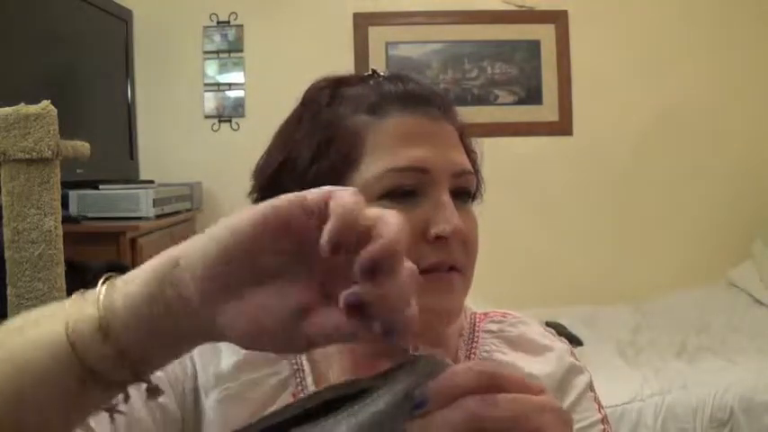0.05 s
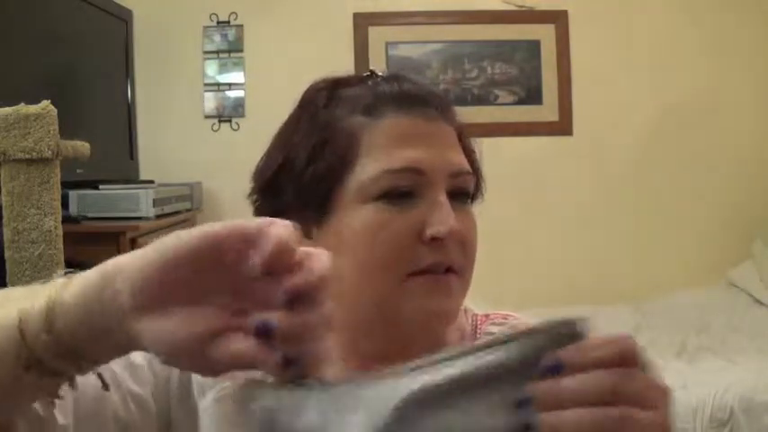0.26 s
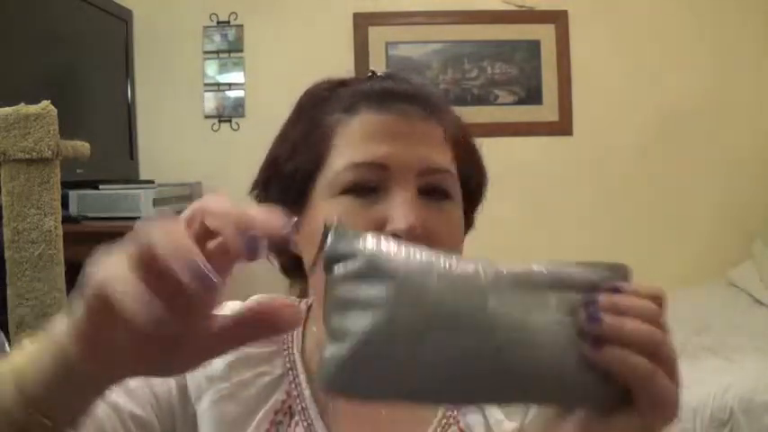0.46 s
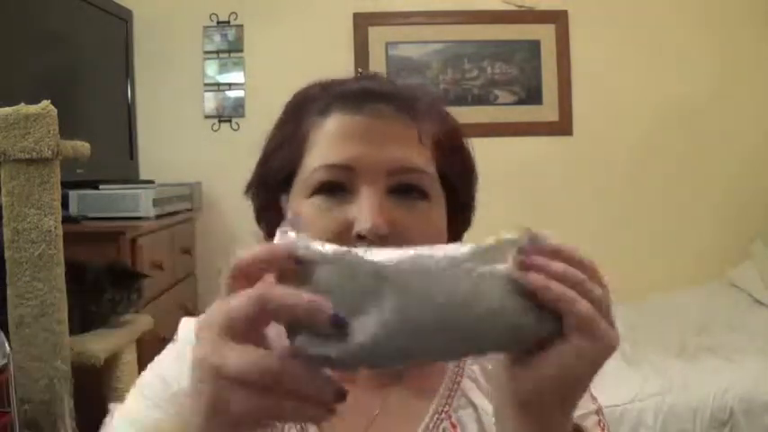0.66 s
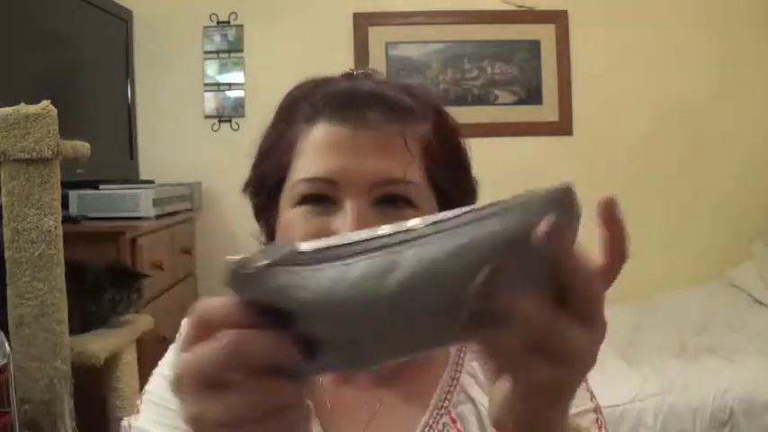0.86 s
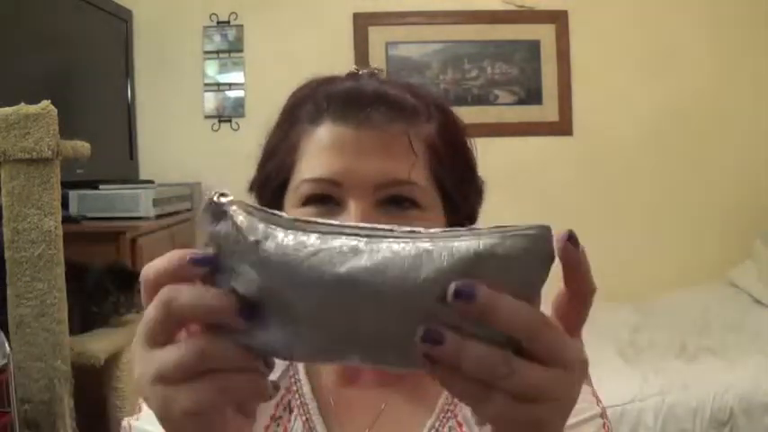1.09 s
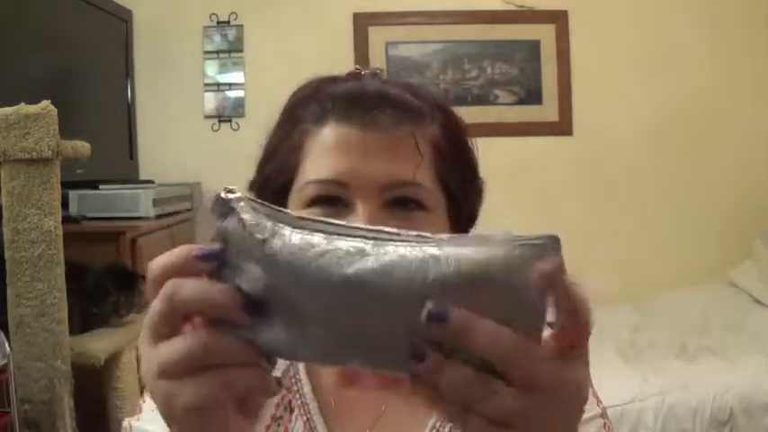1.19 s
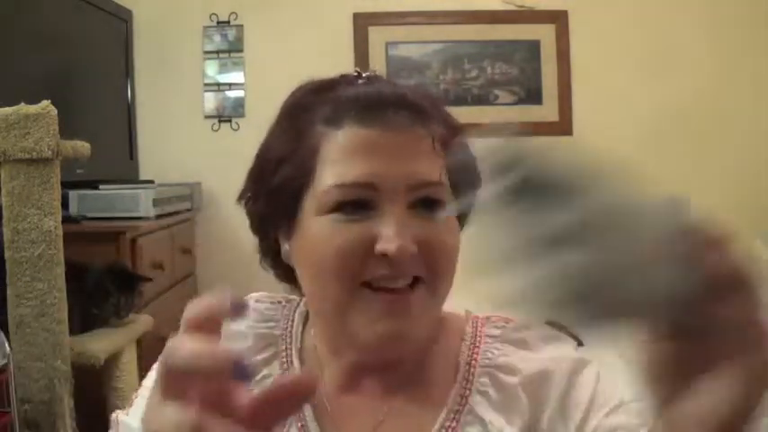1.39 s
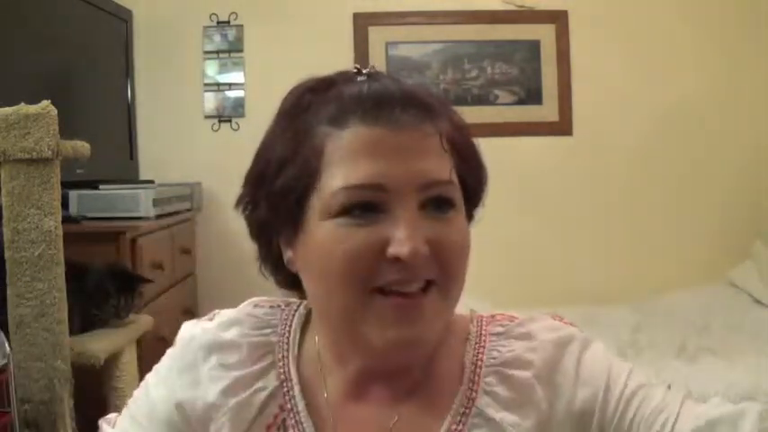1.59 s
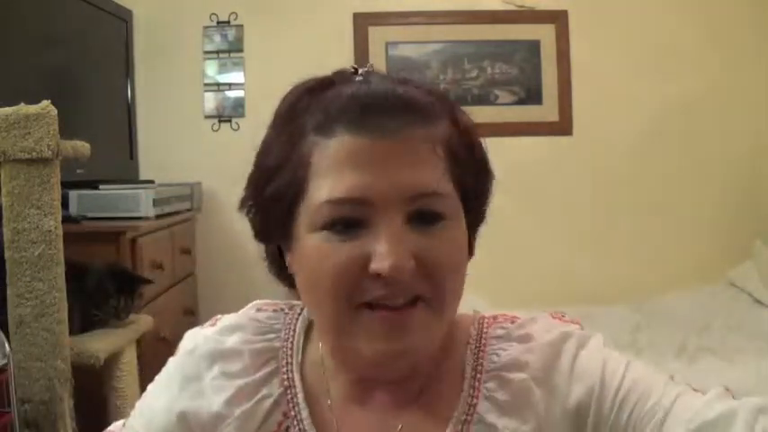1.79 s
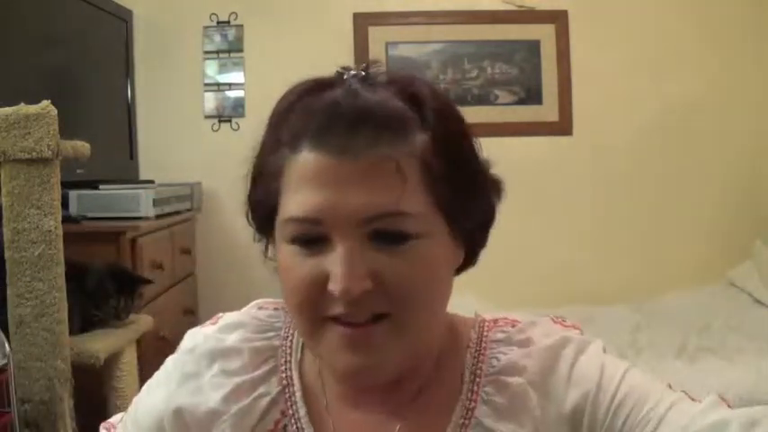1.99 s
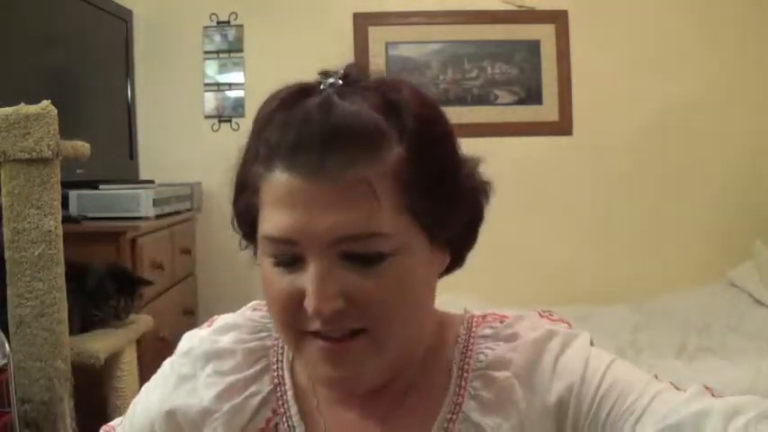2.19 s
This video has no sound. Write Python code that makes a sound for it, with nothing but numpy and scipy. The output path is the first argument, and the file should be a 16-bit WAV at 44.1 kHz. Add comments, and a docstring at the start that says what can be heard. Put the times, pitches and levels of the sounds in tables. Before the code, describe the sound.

Quick rising zip of a pouch, crinkly handling with sharp snaps, then a thud and clatter

```python
"""A leatherette pouch is zipped shut in one quick pull, then turned and squeezed close by.
Its skin rustles, its creases snap; it lands with a thud and a clatter, in a small quiet room with a faint hum.
The zip is a row of tones at the tooth rate plus pulsing noise; the skin is a crowd of tiny clicks and noise.
Snaps and ticks are short filtered noise bursts; thuds and clatter are coloured, quickly fading noise."""
import sys
import numpy as np
from scipy import signal
from scipy.fft import rfft, irfft
from scipy.io import wavfile

SR = 44100
rng = np.random.default_rng(int(sys.argv[2]) if len(sys.argv) > 2 else 0)


def inscribe(sig):
    """Save sig as 16-bit PCM at rate SR to the path in sys.argv[1].

    A 1-D sig is mono; a 2-D sig holds one channel per row.
    Samples are clipped to [-1, 1] before scaling.
    """
    pcm = np.round(np.clip(np.atleast_2d(sig).T, -1, 1) * 32767)
    wavfile.write(sys.argv[1], SR, pcm.astype(np.int16))


N = 99225  # samples, 2.25 s


def undb(db):
    """Turn decibels into gain."""
    return 10 ** (np.asarray(db) / 20)


def unit(x):
    """Scale to rms 1."""
    return x / np.sqrt(np.mean(x ** 2) + 1e-20)


def noise():
    """White noise: equally strong at all pitches."""
    return rng.standard_normal(N)


def shape(x, points):
    """Filter through (f/Hz, level/dB) points without sounding early; white noise keeps its level."""
    hz, db = np.array(points, float).T
    f = np.maximum(np.fft.rfftfreq(N, 1 / SR), 1)
    gain = unit(undb(np.interp(np.log(f), np.log(hz), db)))
    # folding the cepstrum gives the filter that answers as soon as possible (minimum phase)
    cepstrum = irfft(np.log(gain), N)
    cepstrum[1:] *= 2 * (np.arange(1, N) <= N // 2)
    return irfft(rfft(x) * np.exp(rfft(cepstrum)), N)


def colour(x, points):
    """Filter through (f/Hz, level/dB) points and scale to rms 1."""
    return unit(shape(x, points))


def hump(x, hz, octaves):
    """Favour the pitches around one broad resonance; rms 1."""
    f = np.maximum(np.fft.rfftfreq(N, 1 / SR), 1)
    distance = np.log2(f / hz) / octaves
    return unit(irfft(rfft(x) / np.sqrt(1 + distance ** 4), N))


def walk(rate):
    """Smooth random wandering with rms 1, from `rate` random points a second."""
    return unit(np.interp(np.arange(N) / SR * rate, np.arange(N), noise()))


def burst(start, decay, rise):
    """Loudness curve with a quick rise and an exponential fall (all in s)."""
    age = np.maximum(np.arange(N) / SR - start, 0)
    fall = np.exp(-np.minimum(age / max(decay, 1e-4), 20))
    return (1 - np.exp(-np.minimum(age / rise, 20))) * fall


def click(start, hz, octaves, decay):
    """A quickly dying burst of noise through one broad resonance."""
    age = np.arange(2048) / SR
    edges = np.clip([hz / 2 ** (octaves / 2), hz * 2 ** (octaves / 2)], 20, SR * .48)
    b, a = signal.butter(1, edges, "bandpass", fs=SR)
    strike = rng.standard_normal(len(age)) * np.exp(-age / max(decay, 1e-4))
    ring = signal.lfilter(b, a, strike) / np.sqrt(b[0])  # narrow bands are made up in level
    out, first = np.zeros(N + len(age)), int(start * SR)
    out[first:first + len(age)] = ring
    return out[:N]


def crackle():
    """Rubbing surfaces: dense tiny clicks of very uneven size over smooth sliding noise."""
    clicks_per_s, spread_db, smooth_share = 2500, 3, 0.53
    size = undb(spread_db * np.minimum(rng.exponential(size=N), 5))
    clicks = (rng.random(N) < clicks_per_s / SR) * size * np.sign(noise())
    return unit(clicks) + smooth_share * noise()


def crinkles():
    """Flexing skin: sparse single clicks of uneven size; rms 1."""
    crinkles_per_s = 140
    return unit((rng.random(N) < crinkles_per_s / SR) * noise())


def pan(x, db, radians):
    """Place a sound: left is louder by db and ahead by radians of phase, half applied to each side."""
    sides = np.array([[1], [-1]]) / 2
    return irfft(rfft(x) * np.exp(sides * (np.log(undb(db)) + 1j * radians)), N)


def background():
    """Still room air as coloured noise, partly different left and right, with a faint wavering hum."""
    # colour of the air: f/Hz, relative level/dB
    air_colour = [(25,-20),(60,-11),(120,2.5),(250,-2.5),(600,-2),(1100,-3),(1600,3.5),(2200,-3.5),(4000,-14),(10000,-15),(16000,-11)]
    hum_hz, hum_db, air_db = 118.4, -62.5, -52.5
    hum = np.sqrt(2) * np.sin(2 * np.pi * hum_hz * np.arange(N) / SR)
    hum = hum * undb(hum_db + 0.5 * walk(8.2))
    middle = colour(noise(), air_colour)
    side = 0.23 * colour(noise(), air_colour) * np.array([[1], [-1]])
    return hum + undb(air_db) * (middle + side)


def room(x):
    """Many blurred reflections, each band fading at its own pace, partly alike in both ears."""
    # reflections by band: f/Hz, time to fall by 60 dB/s, level/dB
    bands = [(120,0.47,-28.5),(380,0.2,-7),(885,0.31,-11),(1690,0.29,-10),(3760,0.3,-15),(7800,0.64,-34),(12800,.2,-65.5)]
    delay_s, width = 0.0092, 0.58
    hz, t60, db = np.array(bands, float).T
    f = np.log(np.maximum(np.fft.rfftfreq(N, 1 / SR), 1))
    mid, side = noise(), noise()
    field = rfft(np.array([mid + width * side, mid - width * side]) / np.hypot(1, width))
    tail = 0
    for k, share in enumerate(np.eye(len(hz))):
        fall = unit(burst(delay_s, t60[k] / np.log(1000), rise=0.00083)) / np.sqrt(N)
        band = irfft(field * np.interp(f, np.log(hz), share), N)  # neighbouring bands overlap
        tail = tail + band * fall * undb(db[k])
    return signal.fftconvolve(x[None], tail, axes=1)[:, :N]


def landing():
    """The pouch lands and its contents settle: each knock is a dull thud with a clatter inside."""
    # knocks: t/s, thud level/dB, clatter level/dB, decay/s
    knocks = [(1.894,-12.5,-21,0.0065),(1.904,-14.5,-19,0.011),(1.911,-29,-23.5,0.017),(1.927,-18,-23.5,.014),(1.943,-23.5,-27.5,0.027),(1.969,-28,-31,0.0065),(1.995,-35,-39,0.011),(2.035,-26.5,-35,0.015),(2.188,-32,-30,.004),(2.221,-36.5,-44,0.0067)]
    # colour of the thuds: f/Hz, relative level/dB
    thud_colour = [(25,-35),(60,-9),(110,-2),(170,1),(280,0.5),(480,3.5),(800,0.5),(1100,-2),(1800,-9.5),(4000,-39),(16000,-60)]
    # colour of the clatter: f/Hz, relative level/dB
    clatter_colour = [(60,-25),(400,-17),(1000,4),(1600,0.5),(2600,3),(4000,0),(6000,-4),(8500,-5),(12000,-21),(16000,-38)]
    thud_power, clatter_power = 0, 0
    for s, thud_db, clatter_db, decay in knocks:
        blow = burst(s, decay, rise=0.00061) ** 2
        thud_power = thud_power + blow * undb(thud_db) ** 2
        clatter_power = clatter_power + blow * undb(clatter_db) ** 2
    thuds = shape(np.sqrt(thud_power) * noise(), thud_colour)
    return thuds + shape(np.sqrt(clatter_power) * crackle(), clatter_colour)


def creases():
    """Creases give way with short snaps; the pull tab and the skin make tiny sharp ticks."""
    # snaps: t/s, level before the trim/dB, centre f/Hz, decay/s
    snap_list = [(0.635, -19.5, 8900, 0.0025), (0.6872, -12, 5170, 0.0019), (0.7005, -9, 3970, 0.002),
                 (0.7057, -16, 4230, 0.0032), (0.7267, -13.5, 6200, 0.0025), (0.7886, -12.5, 8600, 0.0025),
                 (0.8918, -20.5, 1710, 0.004), (0.9098, -19, 8800, 0.0036), (1.0212, -14, 4900, 0.0011),
                 (1.0266, -12.5, 6030, 0.0019), (1.0555, -14.5, 8250, 0.0019),
                 (1.0652, -15.5, 1580, 0.0033), (1.1018, -19, 8640, 0.0028), (1.1661, -27, 2380, 0.0024),
                 (1.2483, -20, 8350, 0.0013), (1.3298, -12, 3070, 0.0028), (1.3616, -10, 4110, 0.003),
                 (1.3834, -6.5, 4300, 0.0021), (1.41, -11, 8700, 0.0029), (1.4693, -17, 8660, 0.0016),
                 (1.6476, -22.5, 1960, 0.0016), (1.6729, -24.5, 2100, 0.0025),
                 (1.6912, -20.5, 2100, 0.0039), (1.8512, -25, 1480, 0.0041), (2.1657, -21.5, 3050, 0.0023)]
    # colour of the snaps: f/Hz, relative level/dB
    snap_colour = [(60,-12),(400,1.5),(1200,1),(4000,0.5),(9000,-1),(12000,-0.5),(16000,-1.5)]
    # ticks: t/s, level before the trim/dB, centre f/Hz
    tick_list = [(0.061, -25, 10300), (0.0894, -28, 11860), (0.1077, -7.5, 12600), (0.5649, -14, 9630),
                 (0.616, -27, 10700), (0.6524, -13.5, 8720), (0.7747, -17.5, 8680), (0.796, -17, 9390),
                 (0.805, -13, 9010), (0.8114, -14, 9830), (0.9204, -19, 10700), (0.9639, -16, 9300),
                 (1.1268, -12.5, 9800), (1.1404, -17, 9630), (1.2206, -27, 8400), (1.3205, -14.5, 6320),
                 (1.4887, -16, 10100)]
    snap_trim_db, tick_trim_db, tick_decay_s = -7.5, -4, 0.00035
    snaps = sum(click(s, hz, 1, decay) * undb(db + snap_trim_db) for s, db, hz, decay in snap_list)
    ticks = sum(click(s, hz, 0.7, tick_decay_s) * undb(db + tick_trim_db) for s, db, hz in tick_list)
    return shape(snaps, snap_colour) + ticks


def handling():
    """Fingers slide over the skin and flex it: bright crinkle over duller rubbing, with soft bumps."""
    # course of the handling: t/s, bright rustle level before the trim/dB, dull rub level before the trim/dB
    course = [(0,-46.5,-63),(.04,-57.5,-50.5),(.14,-50,-58),(.3,-37.5,-54),(.42,-39.5,-37),(.445,-45.5,-44),(.52,-44.5,-60),(.556,-48.5,-75),(0.613,-55,-55),(0.632,-31.5,-32.5),(0.679,-38.5,-47),(0.701,-31.5,-30.5),(0.745,-38,-40.5),(.806,-33.5,-38),(.826,-38.5,-44),(.908,-34.5,-40.5),(.95,-37.5,-42.5),(1.062,-36.5,-40.5),(1.128,-41.5,-54.5),(1.154,-47,-68),(1.24,-42,-51),(1.286,-41,-44.5),(1.33,-29.5,-37),(1.355,-34.5,-38.5),(1.365,-30,-26.5),(1.413,-29,-35),(1.512,-48.5,-54),(1.592,-42.5,-46),(1.632,-50.5,-57),(1.678,-41.5,-49.5),(1.74,-54,-50),(1.86,-47,-49),(1.93,-33.5,-31),(2.03,-50.5,-42.5),(2.10,-54.5,-49),(2.175,-36,-40.5),(2.25,-46.5,-53.5)]
    # colour of the rustle: f/Hz, relative level/dB
    rustle_colour = [(1470, -14), (2500, -4), (2830, -5), (3310, -5.5), (6150, -3.5), (7360, -5),
                     (9890, 1.5), (12900, -5.5), (16000, -21)]
    # colour of the rubbing: f/Hz, relative level/dB
    rub_colour = [(30,-15),(70,-10.5),(200,-5.5),(450,-5),(750,3),(1100,-1),(1600,3),(2300,-1.5),(3500,-6),(6000,-6.5),(16000,-47)]
    # soft bumps of slider and fingers against the hollow pouch: t/s, level/dB, decay/s
    bump_list = [(.37,-49,.025),(0.408,-37,0.015),(0.687,-49,0.018),(1.019,-43,0.0031),(1.254,-49,0.063),(1.39,-48,0.036),(1.495,-50,0.025)]
    # colour of the bumps: f/Hz, relative level/dB
    bump_colour = [(25,-6),(55,-3.5),(160,-3),(300,2),(500,-12),(1000,-17),(4000,-50)]
    rustle_trim_db, rub_trim_db, crinkle_db = 0.5, -0.5, -6
    t = np.arange(N) / SR
    s, bright, dull = np.array(course, float).T
    flex = walk(110)  # both layers waver together
    grains = crackle() + undb(crinkle_db) * crinkles()  # lone clicks stand out of the rustle
    rustle = colour(hump(grains, 6700, octaves=2.03), rustle_colour)
    rustle = rustle * undb(np.interp(t, s, bright) + rustle_trim_db + 1.1 * flex)
    rub = colour(crackle(), rub_colour) * undb(np.interp(t, s, dull) + rub_trim_db + 2.8 * flex)
    pushes = sum(burst(at, decay, rise=0.0031) * undb(db) for at, db, decay in bump_list)
    return rustle + rub + shape(pushes * noise(), bump_colour)


def zipper():
    """The slider rides over the teeth: the pouch sings at the tooth rate and each tooth rasps."""
    # pull of the slider: t/s, tooth rate f/Hz, then levels before trims: tooth tone/dB, octave/dB, rasp/dB;
    # last, unevenness as a share of the speed
    pull_course = [(.165,277,-79,-65,-47,0.051),(.178,298,-46,-39,-40.5,0.076),(.2,358,-41.5,-48.5,-38.5,0.072),(.219,394,-32.5,-38,-37,.05),(.249,524,-37.5,-43,-31,0.048),(.285,592,-26.5,-41,-35.5,0.02),(.303,880,-34.5,-30,-30.5,0.06),(0.338,860,-26,-25.5,-29.5,.02),(.372,850,-19.5,-23,-31.5,0.022),(.381,795,-20.5,-20,-27,0.022),(.388,755,-17,-29,-31,0.04),(.395,860,-29,-21,-29,0.032),(.409,850,-25,-17.5,-28.5,0.05),(.413,730,-32,-21.5,-36,.05)]
    # colour of the rasp: f/Hz, relative level/dB
    rasp_colour = [(60,-17),(180,-14),(330,-2),(600,-1.5),(1100,6.5),(1500,-1),(2200,-2.5),(4500,-4),(7200,-7),(10000,-3.5),(12500,-14),(16000,-28)]
    tone_trim_db, octave_trim_db, overtone_trim_db, rasp_trim_db = 1, 1, -3.5, 0.5
    tooth_scatter = 0.081  # uneven tooth spacing, radians
    flutter_db = 51  # wavering of the tones per unit of unevenness
    split_hz, full_speed_hz, brighten_power = 4500, 800, 0.54
    t = np.arange(N) / SR
    s, hz, tone, octave, rasp, uneven = np.array(pull_course, float).T

    def along(values):
        return np.interp(t, s, values)

    outside = np.maximum(t - s[-1], 0) + np.maximum(s[0] - t, 0)
    pulling = np.exp(-outside / 0.0048)  # fades within milliseconds of either end
    phase = 2 * np.pi * np.cumsum(along(hz) * (1 + along(uneven) * walk(600))) / SR

    def partial(k, db):
        wave = np.sqrt(2) * np.sin(k * (phase + tooth_scatter * walk(600)))
        return wave * undb(db + flutter_db * along(uneven) * walk(220))

    song = partial(0.99, along(tone) + tone_trim_db)  # a touch below the tooth rate
    song += partial(2, along(octave) + octave_trim_db)
    song += sum(partial(k, along(rasp) + overtone_trim_db) * 2 / k for k in range(3, 8))
    teeth = unit(1 + 0.3 * np.cos(phase))  # the rasp swells once per tooth
    # the slider scrapes before it runs freely
    scrape = hump(noise(), 1406, octaves=0.073) * burst(.172, 0.047, rise=0.0043) * undb(-36.5)
    grit = colour(crackle() * teeth, rasp_colour)
    dull = signal.sosfiltfilt(signal.butter(1, split_hz, fs=SR, output="sos"), grit)
    # a faster pull rasps brighter
    grit = dull + (grit - dull) * (along(hz) / full_speed_hz) ** brighten_power
    return scrape + pulling * (song + grit * undb(along(rasp) + rasp_trim_db))


def scene():
    """Zip and handling in front; the hands then move to the right, where the pouch lands, with more room."""
    # left minus right for things off to the right: f/Hz, level/dB
    aside_balance = [(60,0),(200,-0.5),(400,-3),(1300,-3.5),(4400,-3),(9000,0.5)]
    # phase by which the left leads for the same things: f/Hz, phase/rad
    aside_phase = [(60,.2),(200,0.31),(700,1),(2000,.7),(5000,1.2),(9500,0.35)]
    zip_lag_s, hand_lag_s = .00009, .00005  # right behind left, in the low pitches
    t, f = np.arange(N) / SR, np.fft.rfftfreq(N, 1 / SR)

    def across(points):
        hz, value = np.array(points).T
        return np.interp(np.log(f + 1), np.log(hz), value)

    pull, hands, thud = zipper(), handling() + creases(), landing()
    lows = f / (1 + (f / 1490) ** 4)  # the lag fades out, so the treble is in step on both sides
    moved = np.clip((t - 1.47) / 0.17, 0, 1)  # the hands leave the centre at 1.47 s
    direct = pan(pull, 0.5, 2 * np.pi * zip_lag_s * lows)
    direct += pan(hands * (1 - moved), 0, 2 * np.pi * hand_lag_s * lows)
    direct += pan(thud + hands * moved, across(aside_balance), across(aside_phase))
    reflections = room(undb(-2.0) * pull + hands + undb(1.5) * thud)
    return direct + reflections + background()


def record(dry):
    """A steep filter cuts the treble above 16 kHz."""
    return signal.sosfilt(signal.ellip(8, .2, 70, 16000, fs=SR, output="sos"), dry)


dry = scene()
out = record(dry)
inscribe(out)
```